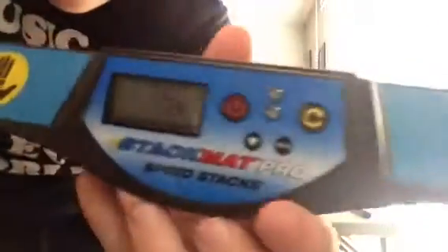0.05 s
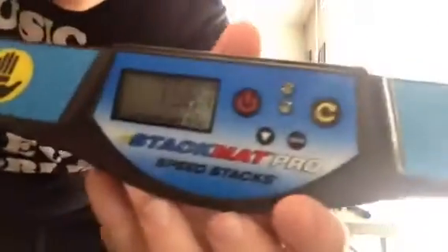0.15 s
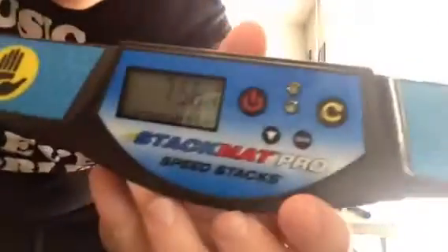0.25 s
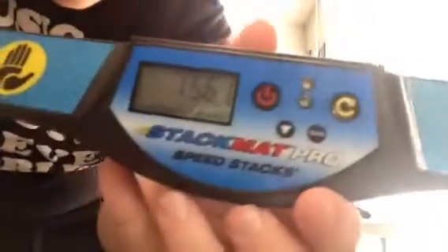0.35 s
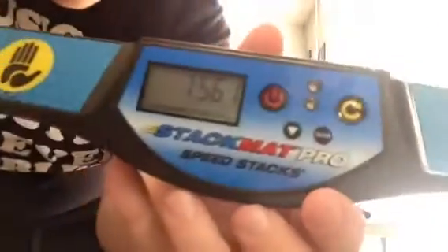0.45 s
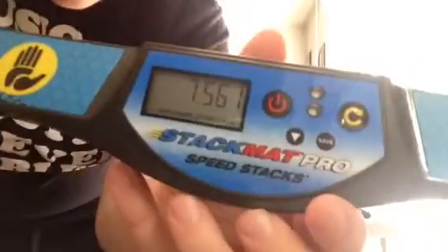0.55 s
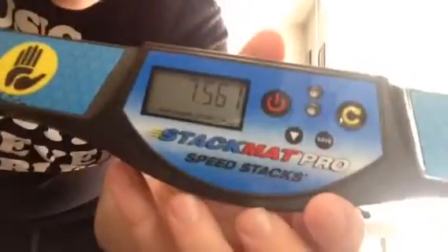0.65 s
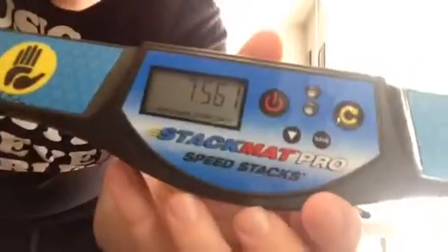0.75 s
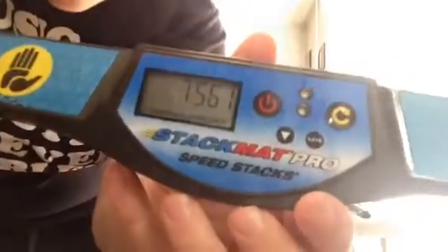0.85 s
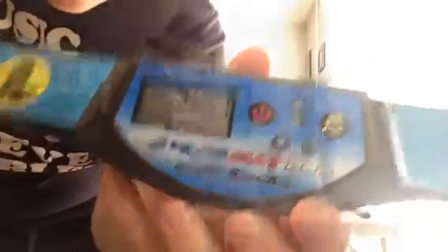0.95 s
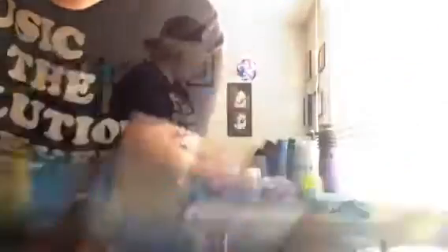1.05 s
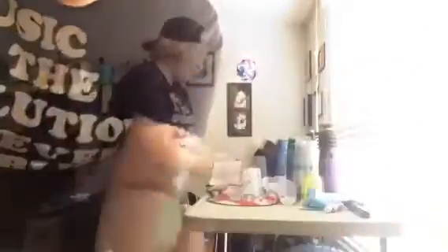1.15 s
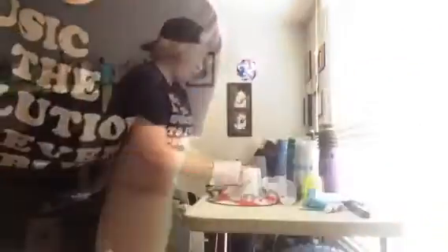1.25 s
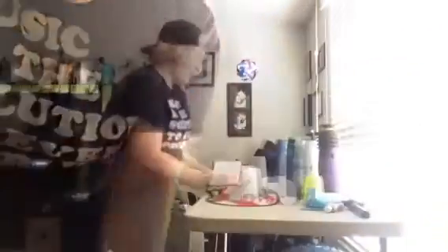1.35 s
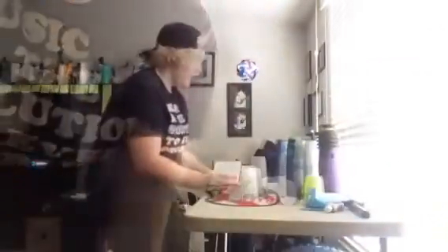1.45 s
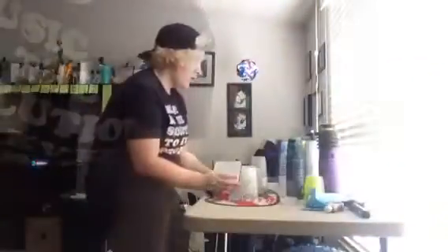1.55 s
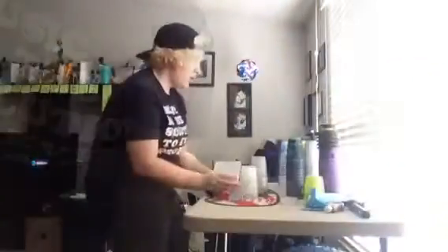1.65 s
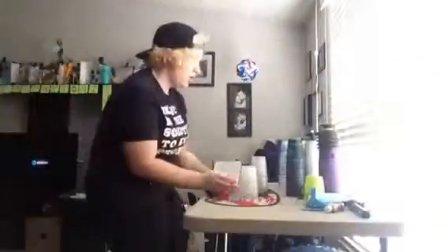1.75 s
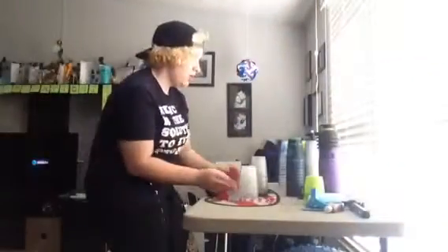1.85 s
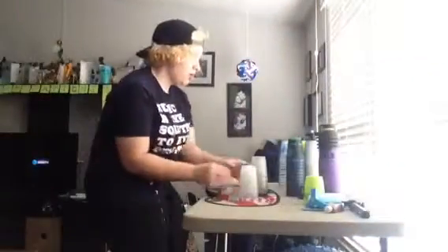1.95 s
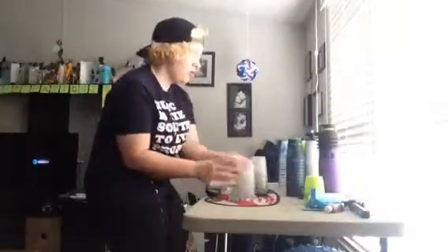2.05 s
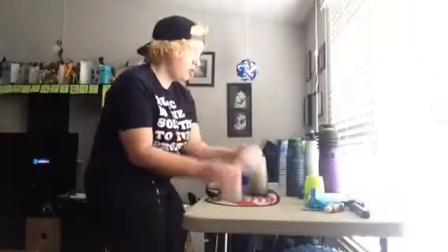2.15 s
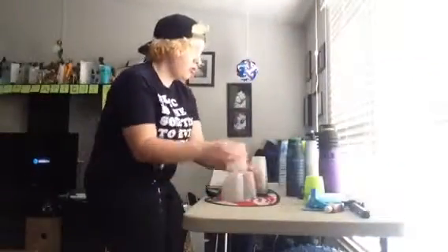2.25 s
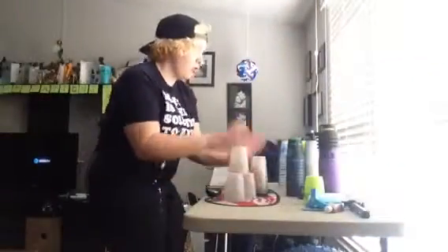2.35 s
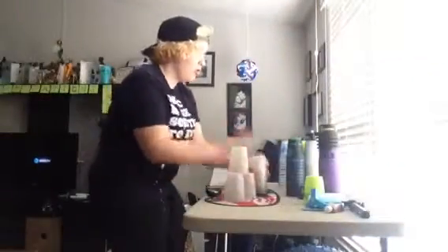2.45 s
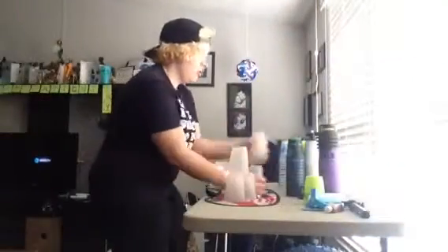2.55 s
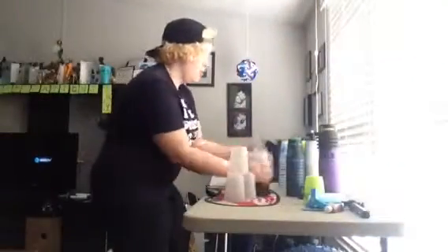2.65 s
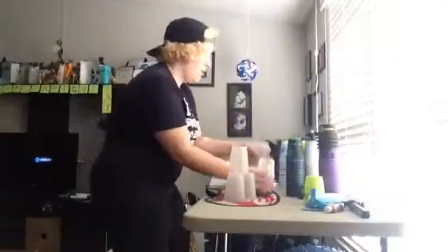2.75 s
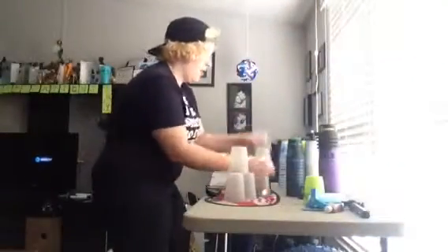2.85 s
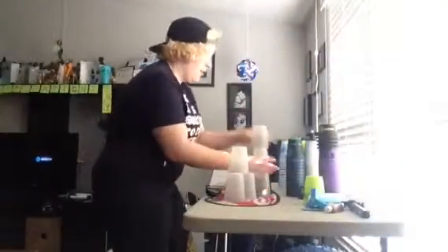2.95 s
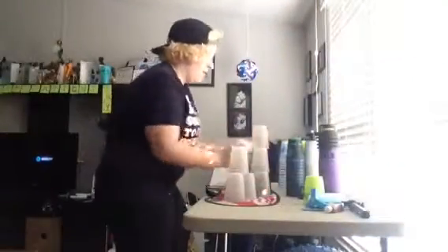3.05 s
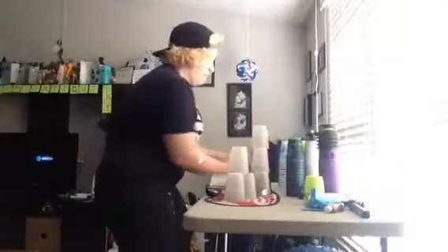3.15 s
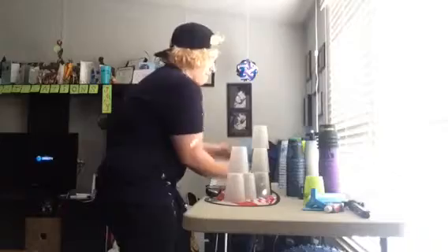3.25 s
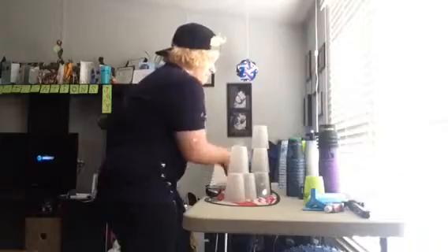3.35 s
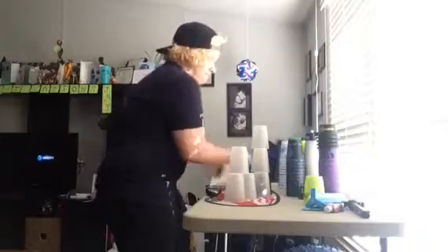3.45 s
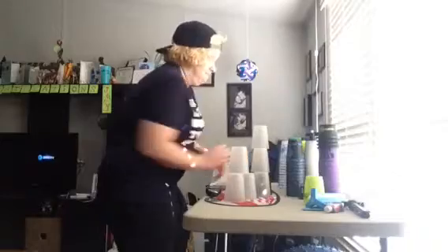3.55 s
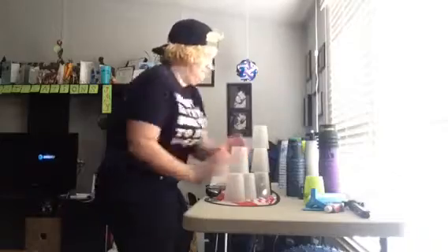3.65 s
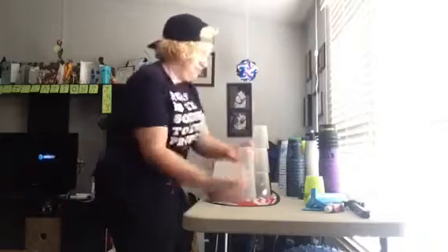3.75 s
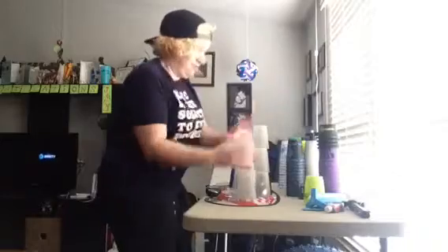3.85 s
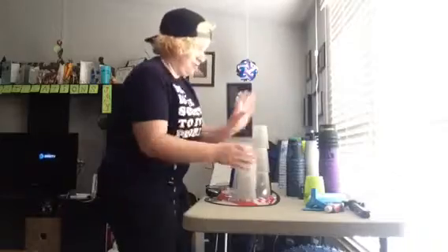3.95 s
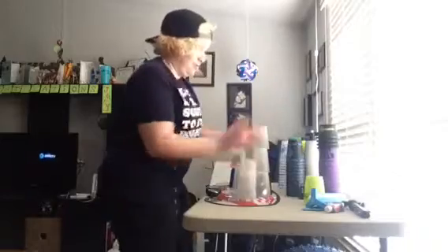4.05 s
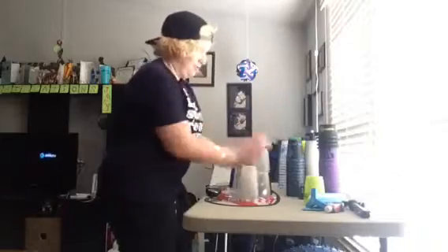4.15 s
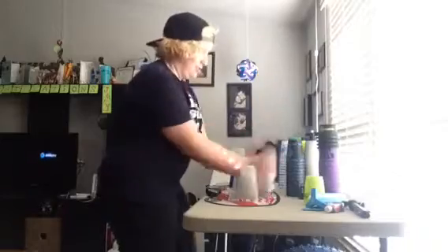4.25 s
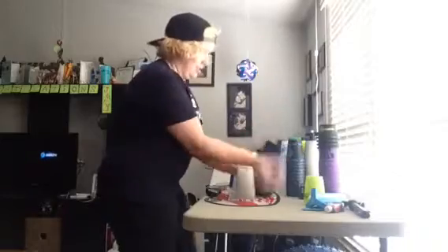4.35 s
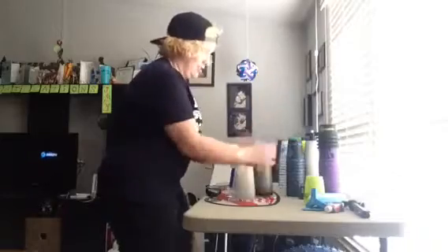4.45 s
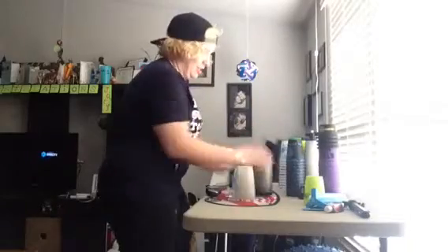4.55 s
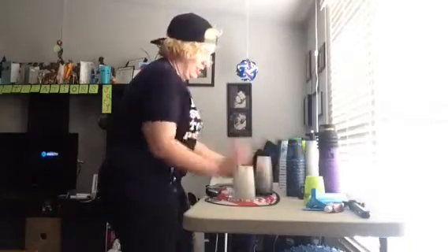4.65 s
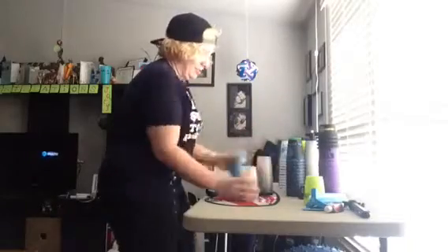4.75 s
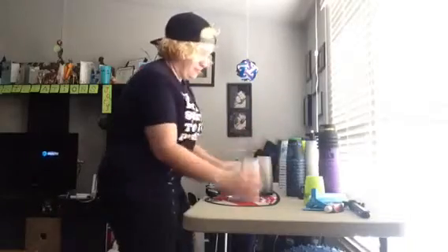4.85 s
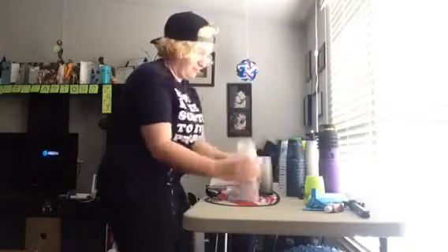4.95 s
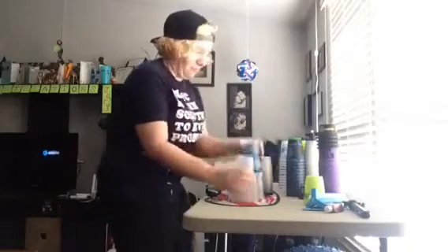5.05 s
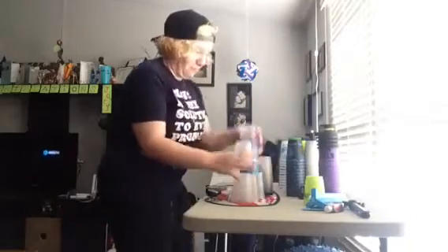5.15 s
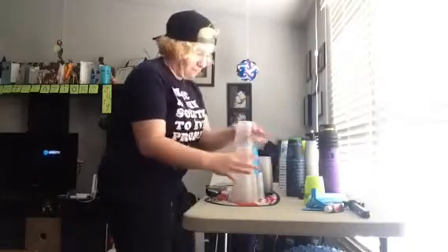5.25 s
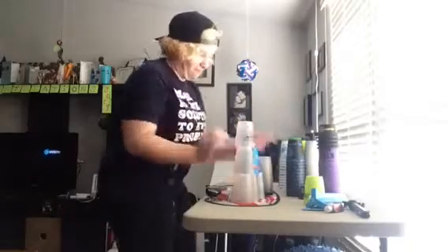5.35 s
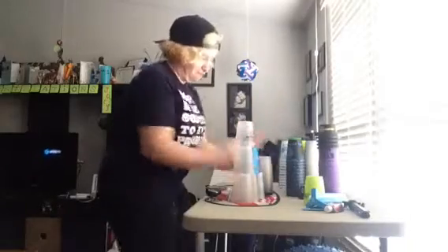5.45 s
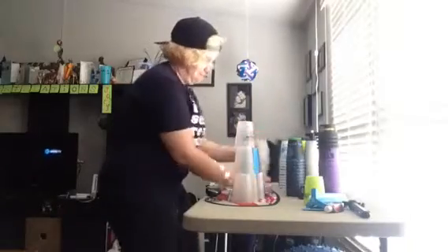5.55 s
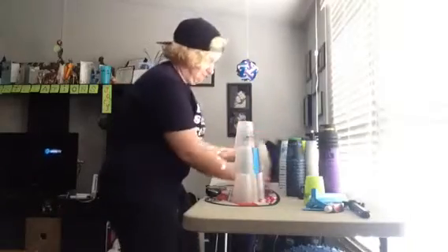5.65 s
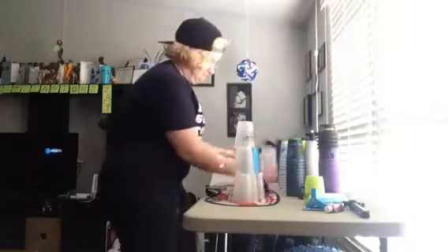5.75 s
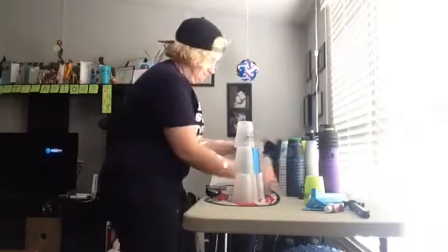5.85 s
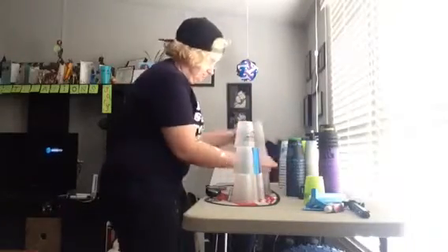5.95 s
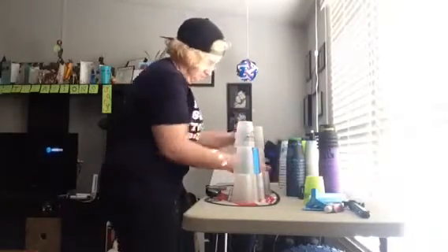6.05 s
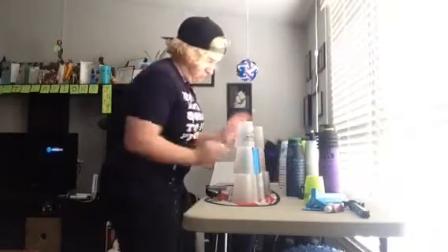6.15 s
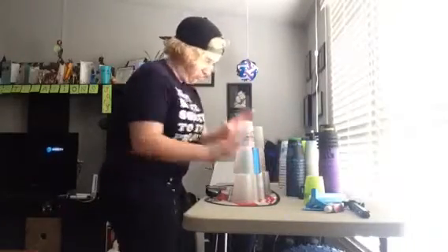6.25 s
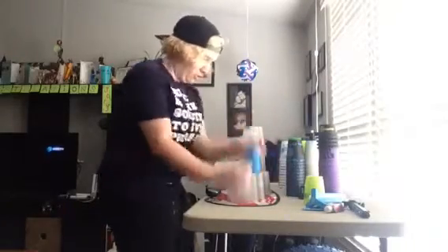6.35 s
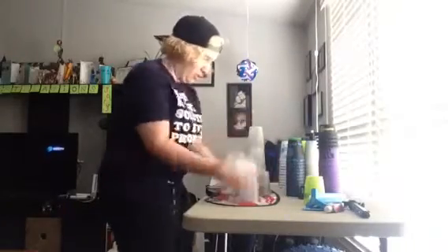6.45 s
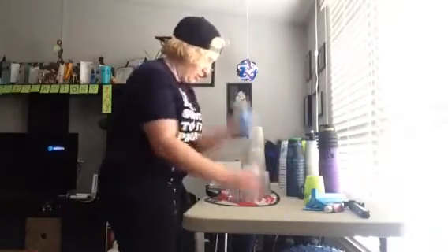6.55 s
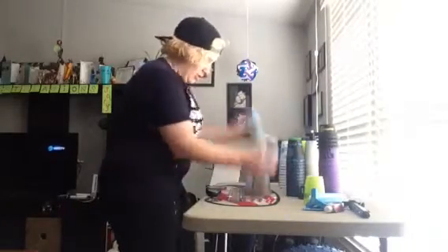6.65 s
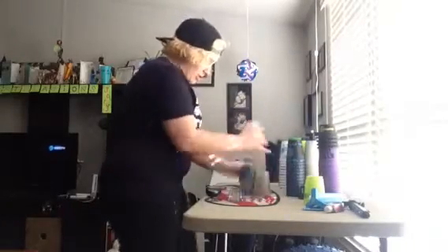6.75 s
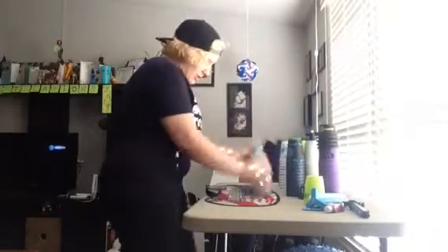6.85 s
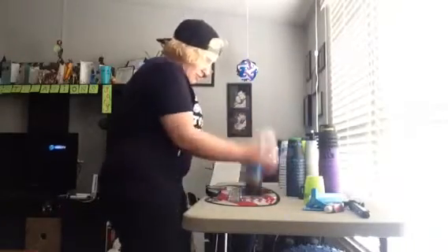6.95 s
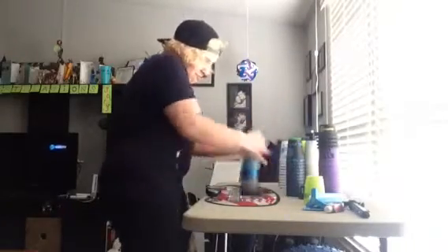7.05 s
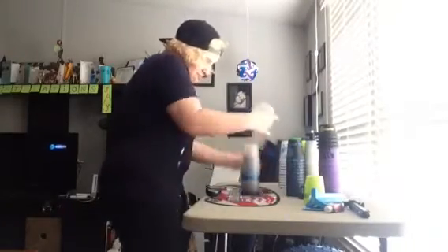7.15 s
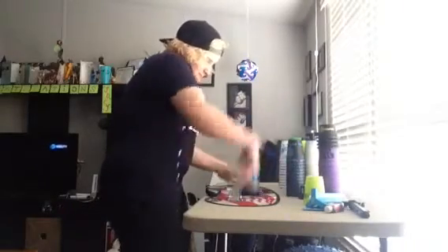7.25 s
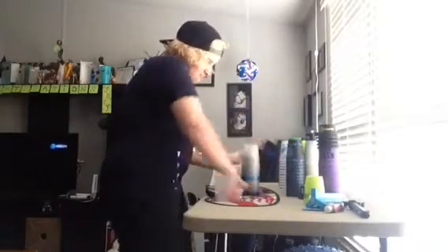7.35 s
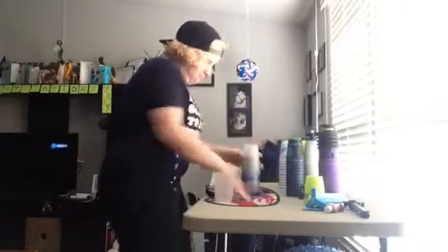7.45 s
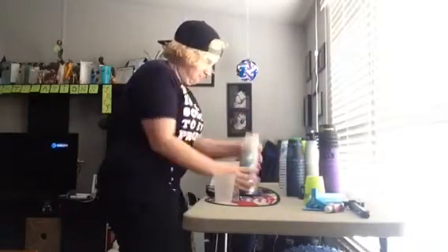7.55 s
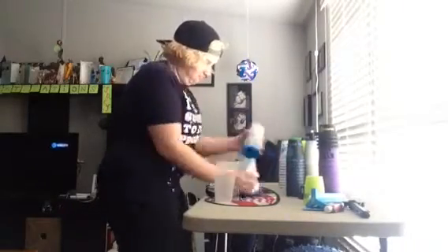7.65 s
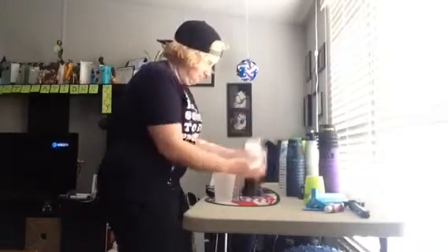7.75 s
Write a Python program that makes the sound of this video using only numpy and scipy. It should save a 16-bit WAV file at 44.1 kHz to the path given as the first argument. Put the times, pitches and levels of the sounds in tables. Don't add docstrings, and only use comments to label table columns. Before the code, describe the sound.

Thin plastic cups clack and rattle in fast dense bursts, popping hollowly and thumping on a padded folding table in a small room.

```python
import sys
import numpy as np
from scipy import signal
from scipy.fft import rfft, irfft
from scipy.io import wavfile
from scipy.ndimage import uniform_filter1d

SR = 44100
rng = np.random.default_rng(int(sys.argv[2]) if len(sys.argv) > 2 else 0)


def voltage_ratio(level):
    return 10 ** (np.asarray(level, float) / 20)


def store_pcm(level_fs):
    pcm = np.round(np.clip(level_fs, -1, 1) * 32767).astype(np.int16)
    wavfile.write(sys.argv[1], SR, np.atleast_2d(pcm).T)


N = 344421

# frequency in Hz, mode strength in dB.
WALL_SPECTRUM = [(900, -10.5), (1500, -0.5), (2200, -0.5), (3300, -1.5), (5300, 1), (7200, -4.5),
                 (9500, -8), (11000, -15), (12500, -19), (16000, -26)]
# frequency in Hz, level in dB, t60 in seconds.
TABLE_MODES = [(181, -5.5, 0.14), (190.7, -4, 0.16), (224.5, 0.5, 0.026), (294, -0.5, 0.083),
               (337.4, 8, 0.022), (367.3, 3, 0.041), (429, -2.5, 0.013), (566, 6, 0.025),
               (594.4, 13, 0.009), (767, -1, 0.014), (910, 0, 0.0061), (1000, -59, 0.017),
               (1315, -37, 0.03)]


def rms_one(x):
    return x / np.sqrt(np.mean(x ** 2) + 1e-20)


def at_hz(points, hz):
    point_hz, value = np.array(points)[:, :2].T
    return np.interp(np.log(hz), np.log(point_hz), value)


def filtered(kind, order, hz, x):
    return signal.sosfilt(signal.butter(order, hz, kind, fs=SR, output="sos"), x)


def coloured(spectrum, size=N):
    hz = np.arange(1, size // 2 + 2) * SR / size
    white = rfft(rng.standard_normal(size))
    return rms_one(irfft(white * voltage_ratio(at_hz(spectrum, hz)), size))


def ring(clicks, hz, t60_s):
    radius = voltage_ratio(-60 / (t60_s * SR))
    w = 2 * np.pi * hz / SR
    return signal.lfilter([0, np.sin(w)], [1, -2 * radius * np.cos(w), radius * radius], clicks + 1e-18)


def by_kind(tables, values):
    return np.transpose([(*row, *value) for rows, value in zip(tables, values) for row in rows])


def blows(start_s, hz, db, t60_s, length_s, count, facing_db=0):
    out = np.zeros((4, N + SR))
    t = np.arange(SR // 14)[:, None] / SR
    late = rng.random((len(start_s), count)) * (np.arange(count) > 0)
    force_db = -3.0 - 22.0 * late + 1.7 * rng.standard_normal(late.shape)
    force = voltage_ratio(force_db * (late > 0)) * rng.choice([-1, 1], late.shape)
    force = force * voltage_ratio(facing_db + 0 * start_s)[:, None]
    side = (-1.) ** np.arange(hz.shape[1])
    for k, s in enumerate(start_s):
        modes = voltage_ratio(db[k] - 60 * t / t60_s[k]) * np.sin(2 * np.pi * hz[k] * t)
        body = modes @ side
        contacts = np.bincount((2 * late[k] * length_s * SR).astype(int), force[k])
        sound = signal.fftconvolve(body, contacts)
        at = round(s * SR)
        out[0, at:at + len(sound)] += sound
        out[1 + k % 3, at:at + len(body)] += body
    return out[:, :N]


def rims():
    # start in seconds, peak in dB, body in dB. Cups seated rim on rim.
    seats = [(2.15, -24, -39), (2.218, -22, -48), (2.331, -23, 8), (2.738, -31, -27),
             (2.799, -14, -19), (2.896, -13.5, -27), (2.971, -20.5, -12), (3.0185, -22.5, -17),
             (3.05, -2.5, -28), (3.291, -14.5, -12.5), (3.447, -18, -26), (3.4505, -4.5, -43),
             (3.465, -2.5, -12), (3.829, -20.5, -6), (3.951, -12.5, -27), (4.107, -5, -24),
             (4.8214, -16, -34), (4.915, -17, 0),
             (5.1617, -10.5, -22), (5.2577, -18.5, -44), (5.309, -25, -7), (5.333, -28, -17),
                    (5.349, -7, -34), (5.6265, -28, -5), (5.861, -17.5, -24), (6.0265, -20.5, 3),
                    (6.0515, -29, -8), (6.1223, -4.5, -32), (6.403, -16.5, -24), (6.4288, -7.5, -27),
                    (6.4337, -4.5, -25), (7.111, -20, 0), (7.324, -29, 7), (7.419, -17.5, 8)]
    slams = [(2.36, -3, -13), (3.781, -23, 6), (3.8925, -31, -12), (3.934, -26.5, -18), (4.028, -20.5, -24),
             (4.17, -10.5, -31), (4.238, -9.5, -27), (4.4506, -9, 1), (4.613, -15.5, 6), (4.6417, -9.5, -4),
             (4.665, -2, -11), (6.477, -6, -18), (6.7379, -16.5, -4), (6.771, -13, -11), (6.795, -12, -2),
             (6.849, -13.5, 10), (6.9182, -10.5, -9), (6.968, -12, 6), (7.146, -24, -4), (7.195, -16, 2),
             (7.704, -22.5, 7)]
    touches = [(1.2, -47, -11), (1.225, -45, -17), (1.288, -31.5, 1), (1.5786, -32.5, -34),
               (1.9755, -56, 16), (2.134, -44, -7), (2.2, -29, -25), (2.31, -29, -29), (2.635, -35.5, -24),
               (2.759, -31.5, -34), (3.279, -27.5, -11), (5.061, -37, -30), (5.098, -40, -45),
               (5.139, -46, -15), (5.545, -31.5, -29), (5.649, -28, -3), (7.672, -36, -18),
               (7.685, -34, 17)]
    snaps = [(2.817, -13.5, -22), (3.486, -6.5, -35), (3.963, -12, -22), (4.28, -4, -8), (4.369, -3.5, -34),
             (5.944, -17, -23), (6.453, -6, -20), (6.495, -9.5, -9), (6.532, -4, -52), (6.6581, -8, -20),
             (7.084, -14.5, -11)]
    # brightness in dB (faster blow, more upper modes), direct sound over the room's share in dB
    kinds = [(-22.5, 1.5), (-8.5, 2.5), (-12, 4), (-16, 7)]
    s, peak_db, body_db, bright_db, facing_db = by_kind(
        [seats, slams, touches, snaps], kinds)
    high = (np.arange(16) + rng.random((len(s), 1))) / 16
    hz = 1100 * 13.43 ** high
    octave = np.log2(hz / 4500)
    upper_db = 0.42 * np.clip(octave, 0, 1.5) * (bright_db[:, None] + 11.0)
    lower_db = 0.32 * np.clip(-octave, 0, 1) * (body_db[:, None] + 13.0)
    db = peak_db[:, None] + 3.0 + at_hz(WALL_SPECTRUM, hz) + 3 * octave + upper_db + lower_db
    db = db + 0.7 * rng.standard_normal(hz.shape)
    t60_s = 6.5 / hz + 0.0006
    return blows(s, hz, db, t60_s, length_s=0.006, count=12, facing_db=facing_db)


def cup_air():
    # start in seconds, peak in dB, pitch in Hz.
    pops = [(2.359, -7, 1280), (2.969, -16.5, 1000), (3.016, -17, 1270), (3.047, -1, 1260),
            (3.451, -11, 750), (3.466, 0.5, 1020), (3.471, -2, 1244), (3.963, -17.5, 1490),
            (4.106, -18, 1310), (4.149, -8.5, 1124), (4.239, -13.5, 1240), (4.291, -12, 926),
            (4.45, -13, 834), (4.616, -13, 1250), (4.639, -15, 1050), (4.667, -4, 838), (5.258, -7, 1080),
            (5.335, -12, 1050), (5.352, -0.5, 1110), (5.628, -16, 1016), (6.123, -3.5, 1244),
            (6.404, -12.5, 1100), (6.456, -10.5, 753), (6.53, -8, 1160), (6.659, -16, 794),
            (6.736, -8.5, 1164), (6.774, -15, 750), (6.918, -15, 794), (7.198, -10, 1110),
            (7.695, -21.5, 820)]
    s, peak_db, pitch_hz = np.transpose(pops)
    detune = voltage_ratio(0.15 * rng.standard_normal((len(s), 4)))
    hz = pitch_hz[:, None] * np.array([0.88, 1, 1.12, 1.26]) * detune
    db = peak_db[:, None] + 5.5 - np.array([15, -0.5, 1.5, 11.5])
    return blows(s, hz, db, 13 / hz, length_s=0, count=1)


def table():
    # start in seconds, peak in dB.
    presses = [
        (1.21, -37),
        (1.289, -29),
        (1.54, -37),
        (2.209, -23),
        (2.655, -23),
        (3.279, -18.5),
        (3.785, -5.5),
        (5.036, -48),
        (5.557, -19.5),
    ]
    landings = [(2.328, -8.5), (2.34, -6.5), (2.792, -7.5), (3.438, -2.5), (4.12, -12.5), (4.282, -7),
                (4.456, -10.5), (4.931, -21.5), (5.162, -12), (5.638, -21), (5.851, -12), (5.938, -11),
                (6.119, -3), (6.438, -5), (6.669, -11.5), (6.738, -5.5), (6.966, -10), (7.098, -11.5),
                (7.328, -12), (7.413, -4.5)]
    knocks = [(2.38, -13), (2.888, -17), (2.978, -15.5), (3.049, -14.5), (3.476, -8), (2.81, -27),
              (3.827, -24), (3.963, -24), (4.263, -11.5), (4.641, -16.5), (5.262, -21), (5.358, -18),
              (6.022, -19), (6.403, -17.5), (6.788, -11), (7.198, -24.5), (7.706, -31)]
    s, peak_db, hard_db = by_kind([presses, landings, knocks], [[-47], [-17.5], [-0.5]])
    hz, level_db, t60_s = np.transpose(TABLE_MODES)[:, None] + np.zeros((len(s), 1))
    tilt_db = 0.5 * np.log2(hz / 200) * (hard_db[:, None] + 10.0) * (hz < 900)
    db = peak_db[:, None] - 9.5 + level_db + tilt_db
    db = db + 1.5 * rng.standard_normal(hz.shape)
    hz = hz * voltage_ratio(0.15 * rng.standard_normal(hz.shape))
    hits = blows(s, hz, db, t60_s, length_s=0.00775, count=4)
    return filtered("low", 1, 900, hits)


def sliding():
    # start in seconds, length in seconds, hiss in dB, table rumble in dB.
    slides = [(2.173, 0.026, -40, -49), (2.342, 0.11, -33, -31), (2.75, .03, -49, -50),
              (2.842, 0.056, -35, -33), (2.99, 0.037, -32, -21.5), (3.066, 0.1, -37, -45),
              (3.51, 0.029, -30, -27), (3.72, 0.059, -29, -50), (3.8, 0.062, -39, -26),
              (4.04, 0.081, -31, -33), (4.244, 0.083, -19, -17), (4.442, 0.03, -22, -20.5),
              (4.643, 0.02, -23.5, -20), (4.76, 0.14, -32, -30.5), (5.334, 0.013, -30, -32),
              (5.86, 0.13, -40.5, -38), (6.036, 0.16, -35, -19.5), (6.19, 0.053, -33, -31),
              (6.488, 0.031, -19.5, -16), (6.76, 0.078, -21, -36), (6.836, 0.052, -20, -11),
              (6.98, 0.032, -24, -17.5), (7.46, 0.41, -40.5, -38.5), (7.693, 0.14, -42, -54)]
    rise_db_per_s, fall_db_per_s = 192, 102
    s, length_s, hiss_db, rumble_db = np.transpose(slides)[:, :, None]
    t = np.arange(0, N, 64) / SR
    before_s = np.clip(s - t, 0, None)
    after_s = np.clip(t - s - length_s, 0, None)
    shape_db = -rise_db_per_s * before_s - fall_db_per_s * after_s

    def contour(level_db):
        return np.interp(np.arange(N) / SR, t, np.max(level_db + shape_db, axis=0))

    grit = voltage_ratio(1.4 * uniform_filter1d(rng.standard_normal(N), size=40) * np.sqrt(40))
    hiss = rms_one(grit * coloured(WALL_SPECTRUM))
    shake = rng.standard_normal(N)
    rumble = rms_one(sum(voltage_ratio(db) * ring(shake, hz, t60_s * 0.95) for hz, db, t60_s in TABLE_MODES))
    return voltage_ratio(contour(hiss_db) - 7.5) * hiss + voltage_ratio(contour(rumble_db) - 7) * rumble


def room(places):
    # frequency in Hz, t60 in seconds.
    decay = [(120, 0.049), (400, 0.27), (1200, 0.35), (4000, 0.19), (12000, 0.27)]
    t = np.arange(SR // 2) / SR
    tail = 0
    for low_hz in 80 * 2. ** np.arange(8):
        white = rng.standard_normal((len(places), len(t)))
        band = filtered("band", 2, [low_hz, min(2 * low_hz, 19000)], white)
        tail = tail + band * voltage_ratio(-60 * t / at_hz(decay, low_hz * np.sqrt(2)))
    tail = tail * (1 - np.exp(-(t / 0.0018) ** 2))
    tail = tail / np.sqrt(np.sum(tail[0] ** 2))
    return signal.fftconvolve(places, tail, axes=1)[:, :N].sum(axis=0)


def ventilation():
    # frequency in Hz, level in dB per Hz.
    air_spectrum = [(30, -36), (65, -30), (95, -25), (135, -13.5), (200, -6.5), (270, -19), (600, -6),
                    (1100, -9.5), (2200, -14.5), (2900, -21.5), (5200, -24), (6000, -31.5), (10000, -41.5),
                    (15000, -48), (16500, -56)]
    # time in seconds, lift in dB.
    drift = [(0, 9), (1.0, 6.5), (2.0, 8.5), (2.5, 7), (7.8, 4.5)]
    # frequency in Hz, width in Hz, level in dB re air noise.
    duct_modes = [(344, 86, -6.5), (567.4, 22, -8)]
    lift_db = np.interp(np.arange(N) / SR, *np.transpose(drift))
    white = rng.standard_normal(N)
    ducts = sum(voltage_ratio(db) * rms_one(ring(white, hz, 3.3 / width_hz)) for hz, width_hz, db in duct_modes)
    return voltage_ratio(-53.5 + lift_db) * (coloured(air_spectrum) + filtered("high", 3, 200, ducts))


def scene():
    crack, pop, thump = rims(), cup_air(), table()
    wet = room(voltage_ratio(9.0) * crack[1:] + voltage_ratio(0.5) * pop[1:] + voltage_ratio(8.5) * thump[1:])
    cups = crack[0] + pop[0] + thump[0] + wet + sliding()
    cups = filtered("high", 4, 165, cups)
    return (cups + ventilation())[None]


def roll_off(x):
    return signal.sosfilt(signal.butter(12, 16440, fs=SR, output="sos"), x)


def record(dry):
    x = filtered("high", 3, 90, dry)
    x = signal.sosfilt(signal.cheby2(8, 30, 15900, fs=SR, output="sos"), x)
    x = 1.08 * np.tanh(x / 1.08)
    x = signal.sosfilt(signal.cheby2(10, 60, 16500, fs=SR, output="sos"), x)
    return roll_off(x)


dry = scene()
out = record(dry)
store_pcm(out)
```